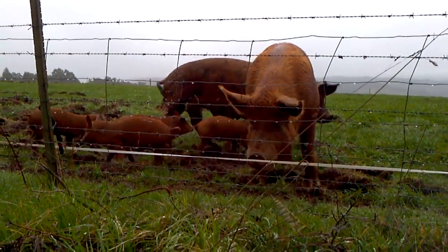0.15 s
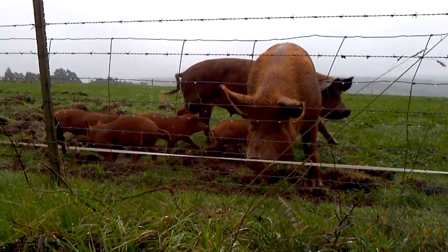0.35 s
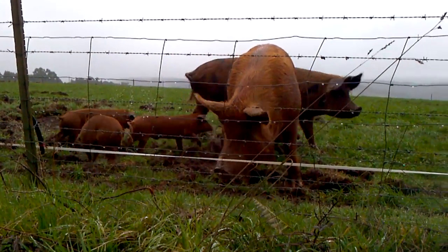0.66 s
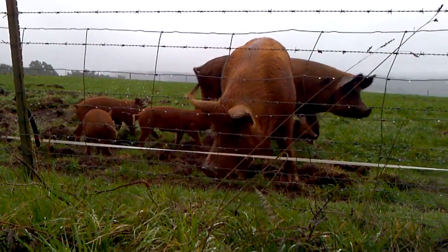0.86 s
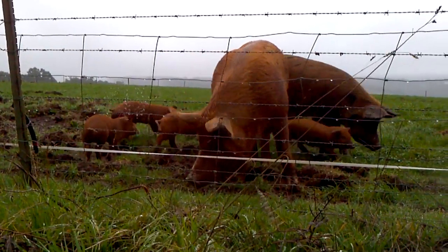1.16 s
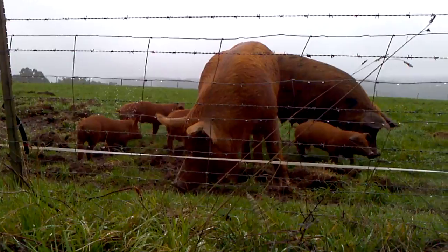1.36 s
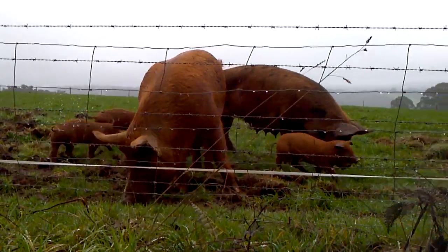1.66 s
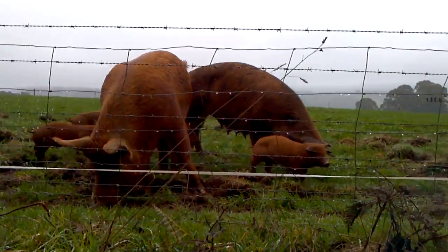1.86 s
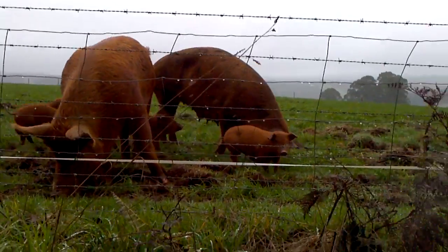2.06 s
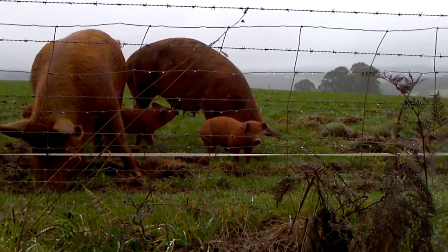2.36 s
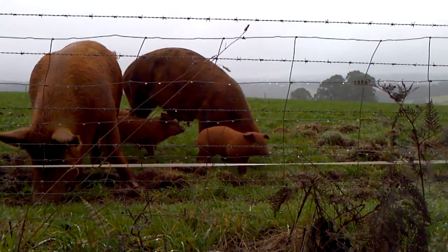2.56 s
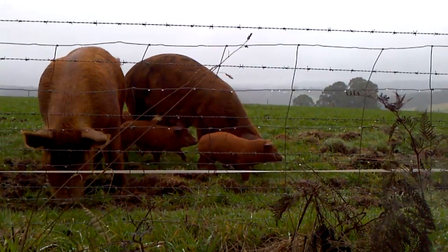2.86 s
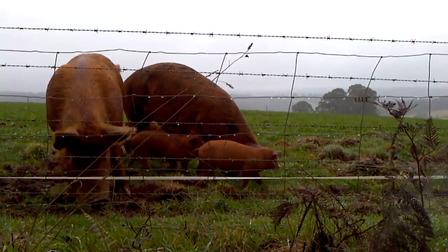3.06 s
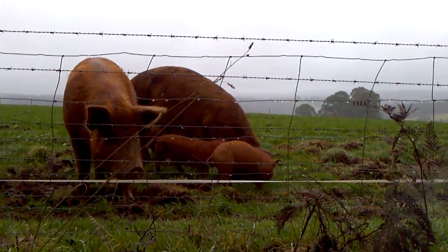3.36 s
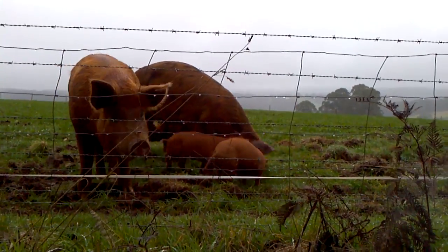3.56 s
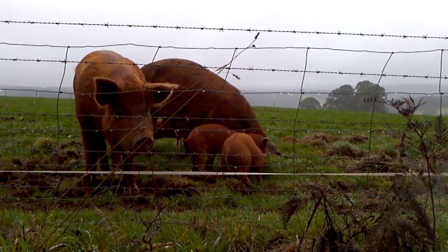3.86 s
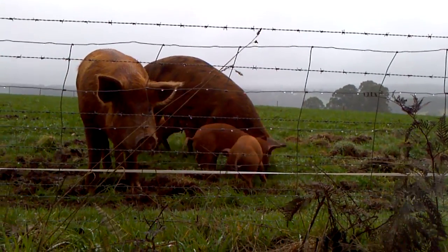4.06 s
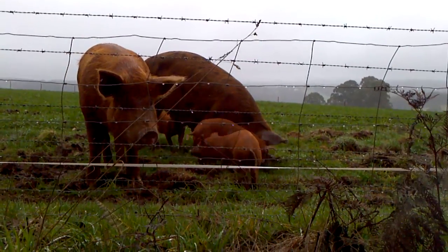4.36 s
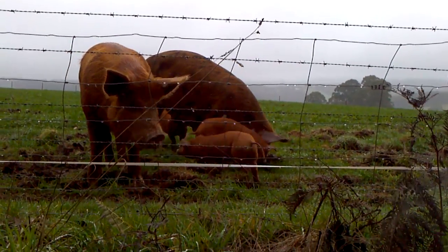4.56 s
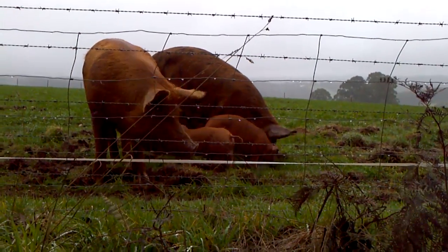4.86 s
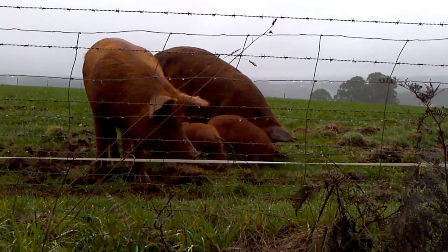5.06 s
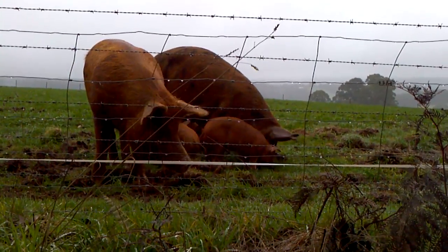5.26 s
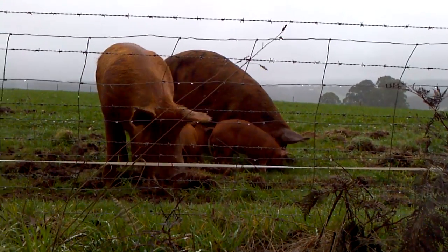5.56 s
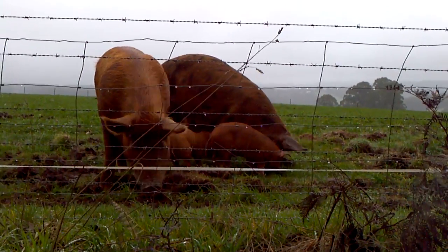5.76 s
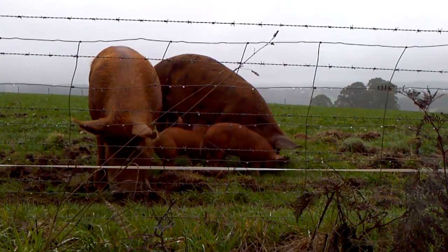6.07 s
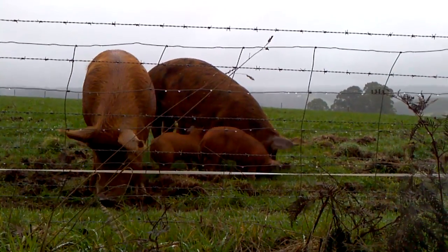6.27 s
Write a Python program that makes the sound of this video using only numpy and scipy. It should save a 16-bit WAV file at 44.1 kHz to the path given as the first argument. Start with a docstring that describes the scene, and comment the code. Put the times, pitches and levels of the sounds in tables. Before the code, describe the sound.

Outdoors in a wet pasture, an engine idles throughout in rapid soft puffs with a faint steady hum. Wind rumbles low, opening with a gust. Piglets start with a weak squeak and dry clicking creaks up to 0.5 s. From 0.7 to 1.5 s hoarse rasps and high squeals overlap, bending downward, then creaks follow. Another raspy squealing run lasts from about 2 to 2.6 s, with a hard wind thump at 2.1. Two quick wet mud smacks come near 2.85 s. At 3.3 s a sow gives one tiny, sagging low grunt amid creaking and rasping. Strong gusts thump around 3.2 and 3.8 s. Harsh cries burst from 3.9 to 4.4 s, one sharply loud near the start. Calls thin to small creaks around 5 s, then squeaks peak piercingly at 5.6. A softer smack at 5.8 s and faint squeals end it. The sound is thin, centred and muffled on top.

```python
"""An engine idles in noise puffs and firing-rate tones while gusts of low noise and thumps buffet the mic.
Piglets in a wet field squeal in three flickering partials, creak in rows of ringing clicks and rasp in
dense partials that break up under sliding resonances. Noise bursts smack in the mud, first near 3 s, and
a sow grunts once, at 3.3 s, in sagging pulses that ring her chest. The single mic has no bass, little top."""
import sys
import numpy as np
from scipy import signal
from scipy.fft import rfft, irfft
from scipy.io import wavfile

SR = 44100
rng = np.random.default_rng(int(sys.argv[2]) if len(sys.argv) > 2 else 0)


def generate_wav(sig):
    """Save sig (samples, or channels by samples) to the path in sys.argv[1] as 16-bit PCM at SR."""
    pcm = np.round(np.clip(np.atleast_2d(sig).T, -1, 1) * 32767).astype(np.int16)
    wavfile.write(sys.argv[1], SR, pcm)


N = 283510


def amp(db):
    """Gain of a level in dB."""
    return 10 ** (np.asarray(db) / 20)


def rms_one(x):
    """Scaled to unit rms."""
    return x / np.sqrt(np.mean(x ** 2) + 1e-20)


def in_time(rows, span=slice(0, N)):
    """Columns of a table, drawn as straight lines between its moments."""
    s, *columns = np.transpose(rows)
    t = np.arange(N)[span] / SR
    return [np.interp(t, s, column) for column in columns]


def call(start_s, end_s, fade_s):
    """Samples that a call covers and its straight fade in and out."""
    span = slice(int(start_s * SR), min(int(end_s * SR), N))
    k = np.arange(span.stop - span.start)
    return span, np.clip(np.minimum(k, k[::-1]) / (fade_s * SR), 0, 1)


def slow(rate_hz, size=N):
    """Wandering curve of spread 1: noise through a double one-pole low-pass, past its run-in."""
    run_in = 3000
    r = np.exp(-2 * np.pi * rate_hz / SR)
    noise = rng.standard_normal(size + run_in)
    return rms_one(signal.lfilter([1], [1, -2 * r, r * r], noise))[run_in:]


def ring(clicks, hz, t60):
    """A resonance: a unit click starts a sine of height 1 that dies by 60 dB in t60 seconds."""
    r, w = amp(-60 / (t60 * SR)), 2 * np.pi * hz / SR
    return signal.lfilter([0, np.sin(w)], [1, -2 * r * np.cos(w), r * r], clicks + 1e-18)


def pulses(rate_hz):
    """One unit sample per cycle."""
    return np.diff(np.floor(np.cumsum(rate_hz) / SR), prepend=0)


def bandpass(x, low_hz, high_hz):
    """Gentle second-order band."""
    return signal.sosfilt(signal.butter(2, [low_hz, high_hz], "band", fs=SR, output="sos"), x)


# Colour of the exhaust noise. Each row: frequency in Hz, relative density in dB per Hz.
ENGINE_COLOUR = [(24, -49), (45, -13.5), (75, -4.5), (100, -10.5), (125, -3.5), (202, -14), (307, -1),
                 (523, -11), (700, -9), (1600, -18.5), (6130, -26), (7000, -32.5), (8000, -82.5),
                 (17600, -120)]
# Orders that stand out as tones. Each row: multiple of the firing rate, mean level in dB.
EXHAUST_ORDERS = [(5, -53), (12, -53), (13, -55), (15, -56.5)]
FIRING_HZ, FIRST_FIRING_S = 24.57, .008
ENGINE_DB = -46   # noise rms


def engine():
    """Exhaust noise puffs once per firing; some orders of the firing rate stand out as tones."""
    t = np.arange(N) / SR
    turns = FIRING_HZ * (t - FIRST_FIRING_S) + .04 * slow(2.05)   # idle wanders a little
    cycle = turns % 1
    puff = 9 * cycle * np.exp(-7 * cycle) * amp(2 * slow(15))
    hz = np.maximum(np.fft.rfftfreq(N, 1 / SR), 1)
    colour_hz, colour_db = np.transpose(ENGINE_COLOUR)
    colour = amp(np.interp(np.log(hz), np.log(colour_hz), colour_db))
    puffing = rng.standard_normal(N) * (0.55 + puff)
    noise = rms_one(irfft(rfft(puffing) * colour, N))
    tones = np.zeros(N)
    for order, db in EXHAUST_ORDERS:
        tones += amp(db + 3.7 * slow(4.9)) * np.sin(2 * np.pi * (order * turns + rng.random()))
    return noise * amp(ENGINE_DB + 1.52 * slow(0.37)) + tones


# Swells of the wind. Each row: peak in seconds, level in dB.
GUSTS = [(.1, -36), (1.25, -44.5), (2.0, -41.5), (2.17, -44), (2.62, -42.5), (3.25, -32.5), (3.46, -40),
         (3.78, -30), (4.0, -33.5), (4.75, -37), (5.82, -42.5), (6.27, -44)]
BREEZE_DB, GUST_RISE_DB_PER_S, GUST_FALL_DB_PER_S = -51, 121.5, 85


def gusts():
    """Strength of the wind: a breeze plus gusts that rise fast and ebb slower."""
    strength = np.full(N, amp(BREEZE_DB))
    for peak_s, db in GUSTS:
        since = np.arange(N) / SR - peak_s
        strength += amp(db + np.minimum(GUST_RISE_DB_PER_S * since, -GUST_FALL_DB_PER_S * since))
    return strength


# Eddies that thump the microphone port. Each row: start in seconds, strength in dB.
BUFFETS = [(1.442, -25), (1.49, -22), (1.691, -24.5), (2.004, -25), (2.12, -12.5), (2.588, -17.5),
           (2.734, -23), (3.147, -16), (3.424, -21), (3.721, -20.5), (3.781, -12), (3.809, -12),
           (3.86, -23.5), (4.004, -24.5), (4.71, -24.5), (5.77, -29), (5.856, -30.5), (6.224, -26.5)]


def wind():
    """Lumpy low turbulence, with the strongest eddies as damped 150 Hz thumps."""
    lumpy = rng.standard_normal(N) * amp(4.34 * slow(20))
    out = rms_one(bandpass(lumpy, 100, 240)) * gusts()
    t = np.arange(2000) / SR
    envelope = (1 - np.exp(-t / 0.0012)) * np.exp(-t / 0.013)
    for s, db in BUFFETS:
        # a hard eddy starts with a quick flick in pitch
        turns = 150 * t + 0.06 * (db + 34.5) * (1 - np.exp(-t / 0.0031))
        out[int(s * SR):][:len(t)] -= amp(db - 3.5) * envelope * np.sin(2 * np.pi * turns)
    return out


# Short squeaks. Each row: start, loudest moment and end in seconds, pitch in Hz at those three moments,
# level in dB, fundamental and third partial in dB against the level, roughness from 0 to 1.
SQUEAKS = [(0, .01, .23, 2000, 2000, 1970, -53, -2, -8, .4),
           (.745, .785, .87, 2355, 2290, 1990, -41, 5.5, -2, .1),
           (.95, 1.01, 1.035, 1723, 1715, 1710, -34, -22, -4, .2),
           (1.04, 1.08, 1.11, 1614, 1830, 1870, -36, -4, 0, .1),
           (1.44, 1.465, 1.485, 1104, 1060, 1037, -58, 18.5, -4, .2),
           (2.53, 2.58, 2.65, 1800, 2100, 1750, -48, -8, -8, .3),
           (2.645, 2.665, 2.705, 1166, 1030, 960, -45, 3, -2, .1),
           (3.455, 3.49, 3.51, 2340, 2250, 1960, -42, -6, -4, .15),
           (3.71, 3.74, 3.795, 1950, 2026, 1860, -48, 2, -4, .3),
           (3.92, 3.955, 3.985, 700, 975, 990, -38, -2, 13, .25),
           (3.985, 4.0, 4.055, 1255, 1240, 1213, -50, 11, -4, .1),
           (4.035, 4.07, 4.12, 1646, 1730, 1670, -36, -33, -4, .4),
           (4.335, 4.39, 4.435, 1154, 1370, 1260, -54, 17.5, -4, .9),
           (5.43, 5.452, 5.475, 1700, 1985, 2060, -35, -4, -4, .25),
           (5.515, 5.54, 5.595, 2000, 2550, 2200, -43, 10, -4, .2),
           (5.605, 5.64, 5.67, 2370, 2600, 2380, -26, -15, -10, .25),
           (6.012, 6.025, 6.045, 1850, 2090, 2350, -38, -14, -10, .25)]
SWELL_DB, DIE_DB = 9.0, 9.0   # gain up to the loudest moment, loss after it


def squeak_curve(start_s, loudest_s, end_s, start_hz, loudest_hz, end_hz, db, first_db, third_db, rough):
    """A squeak swells to its loudest moment and dies away while the pitch bends."""
    start = (start_s, start_hz, db - SWELL_DB)
    loudest = (loudest_s, loudest_hz, db)
    end = (end_s, end_hz, db - DIE_DB)
    return first_db, third_db, rough, [start, loudest, end]


# Long squeals. Each row: fundamental and third partial in dB against the level, roughness from 0 to 1,
# then a curve of moments, each with time in seconds, pitch in Hz, level in dB.
SQUEALS = [ (-9, -6, 0.06, [(1.095, 2230, -27), (1.15, 2183, -39.5), (1.22, 1936, -35.5),
           (1.295, 1855, -41)]), (-3, 1, 0.11, [(2.075, 2200, -43), (2.125, 2000, -40.5),
           (2.165, 2114, -35.5), (2.25, 2060, -47), (2.32, 1927, -36), (2.42, 1830, -48)]),
           (-4, -10, 0.081, [(4.09, 2485, -48), (4.125, 2250, -48), (4.22, 2415, -39.5),
           (4.25, 2245, -27.5), (4.285, 1940, -55)]), (5, 2.5, 0.08, [(6.24, 1815, -55.5),
           (6.3, 1737, -56.5), (6.39, 1847, -52), (6.428, 1800, -56)])]
JITTER = .09   # fast pitch unsteadiness at full roughness, share of the pitch


def squeals():
    """Whistle-like voice: three partials on a slightly unsteady pitch, each flickering on its own."""
    out = np.zeros(N)
    for first_db, third_db, rough, rows in SQUEALS + [squeak_curve(*row) for row in SQUEAKS]:
        span, fade = call(rows[0][0], rows[-1][0], .006)
        hz, db = in_time(rows, span)
        size = len(hz)
        unsteady_hz = hz * (1 + .008 * slow(60, size) + rough * JITTER * slow(300, size))
        phase = 2 * np.pi * np.cumsum(unsteady_hz) / SR
        for partial, partial_db in enumerate([first_db, 0, third_db], start=1):
            flicker = amp(2.5 * slow(30, size)) + .3 * slow(200, size)
            out[span] += fade * amp(db + partial_db) * flicker * np.sin(partial * phase)
    return out


# Rows of single vocal-fold flaps. Each row: first and last flap in seconds, flaps per second,
# level at the middle of the swell in dB, treble in dB against it.
CREAKS = [(.075, .175, 72, -38, -7), (0.382, .52, 60, -42, -7), (1.505, 1.562, 78, -33.5, 0),
          (1.591, 1.659, 73, -36, -9), (1.92, 1.97, 49, -37.5, 8), (3.224, 3.34, 71, -40, -15),
          (4.811, 4.84, 79, -38.5, -1.5), (4.995, 5.015, 62, -44.5, 5), (5.474, 5.486, 81, -36.5, 6),
          (5.896, 5.968, 75, -41.5, 8)]
# Resonances that a flap sets ringing. Each row: frequency in Hz, level in dB, 60 dB decay in seconds.
THROAT = [(2045, -7, 0.02), (3300, -1, 0.011), (4720, -8.5, 0.018)]
# The mouth's resonances. Each row: frequency in Hz, level in dB, 60 dB decay in seconds.
MOUTH = [(5730, -19.5, 0.018), (6230, -1, 0.0087)]


def creaks():
    """Each flap rings throat and mouth; the row swells and fades."""
    low, high = np.zeros((2, N))
    for first_s, last_s, per_s, db, treble_db in CREAKS:
        at = (np.arange(first_s, last_s, 1 / per_s) * SR).astype(int)
        chance = rng.standard_normal((20, 2))[:len(at)]
        swell = np.sin(np.pi * np.arange(1, len(at) + 1) / (len(at) + 1))
        low[at] += swell * amp(db + 2.5 * chance[:, 0])
        high[at] += swell * amp(db + treble_db + 3.5 * chance[:, 1])
    throat = sum(amp(db) * ring(low, hz, t60) for hz, db, t60 in THROAT)
    mouth = sum(amp(db) * ring(high, hz, t60) for hz, db, t60 in MOUTH)
    return throat + mouth


# Hoarse cries. Each row: start and end in seconds, effort in dB,
# upper throat resonance in Hz at the start and at the end.
RASP = [(0.696, 0.939, -32.5, 6350, 4556), (0.922, 1.066, -25.5, 5410, 5105),
        (1.031, 1.196, -28, 5430, 4870), (1.173, 1.342, -34.5, 4910, 5350),
        (1.307, 1.501, -26.5, 4790, 5845), (1.666, 1.697, -47, 4480, 4450),
        (1.957, 2.084, -29.5, 5880, 5610), (2.073, 2.279, -32.5, 6240, 6130),
        (2.219, 2.615, -42, 5740, 5530), (3.339, 3.409, -27.5, 6490, 5620), (3.41, 3.504, -39, 5960, 6200),
        (3.681, 3.738, -42, 4990, 5880), (3.832, 4.049, -39, 5505, 4820), (3.923, 3.975, -19.5, 5285, 6280),
        (4.029, 4.145, -29.5, 5600, 4840), (4.129, 4.329, -33, 4890, 5340), (4.329, 4.419, -27, 4984, 5280),
        (5.424, 5.46, -36, 5400, 6200), (5.482, 5.595, -32, 6030, 5030), (5.588, 5.696, -33.5, 5100, 5620),
        (6.001, 6.204, -41, 5240, 4940), (6.181, 6.42, -47, 6440, 6110)]
# louder cries are brighter: lower resonance (dB) at a usual effort (dB), and its loss per dB of effort
LOWER_DB, USUAL_DB, LOSS_PER_DB = -4.5, -35.5, 0.38


def rasp():
    """Hoarse voice: dense partials break up and return under throat resonances that slide with the mouth."""
    out = np.zeros(N)
    for start_s, end_s, db, from_hz, to_hz in RASP:
        lower_db = LOWER_DB - LOSS_PER_DB * (db - USUAL_DB)
        span, fade = call(start_s, end_s + .012, 0.28 * (end_s - start_s))
        size = len(fade)
        upper_hz = np.linspace(from_hz, to_hz, size)
        pitch_hz = upper_hz / 12 * (1 + .03 * slow(13, size) + .005 * slow(250, size))
        phase = 2 * np.pi * np.cumsum(pitch_hz) / SR
        # each resonance: centre in Hz, half-width in Hz, level in dB
        resonances = [(upper_hz, 500, 0), (upper_hz * 1.168, 500, -6),
                      (3450, 450, lower_db), (1900, 800, lower_db - 10)]
        voice = np.zeros(size)
        for k in range(1, 18):
            throat = sum(amp(level_db) / (1 + ((k * pitch_hz - centre_hz) / width_hz) ** 2)
                         for centre_hz, width_hz, level_db in resonances)
            breakup = amp(5.5 * slow(28, size)) + .6 * slow(260, size)
            voice += throat * breakup * np.sin(k * phase + 2 * np.pi * rng.random())
        out[span] += fade * amp(db - 12 + 0.77 * slow(26, size)) * voice
    return out


# Wet smacks in the mud. Each row: start in seconds, burst level in dB ahead of the band filter.
SMACKS = [(2.835, -22.5), (2.87, -30.5), (5.817, -27)]


def smacks():
    """Bright noise bursts of a few milliseconds."""
    hits = np.zeros(N)
    for s, db in SMACKS:
        hits[int(s * SR)] = amp(db)
    decay = signal.lfilter([1], [1, -np.exp(-1 / (.0025 * SR))], hits)
    return bandpass(decay * rng.standard_normal(N), 3000, 4900)


GRUNT_S, GRUNT_LENGTH_S, GRUNT_ATTACK_S, GRUNT_DB = 3.333, 0.05, 0.0068, -28
GRUNT_HZ, GRUNT_SAG_HZ_PER_S, GRUNT_DECAY_DB_PER_S = 182, 490, 331


def grunt():
    """Regular pulses of the sow's folds ring her chest; pitch and level sag."""
    span, fade = call(GRUNT_S, GRUNT_S + GRUNT_LENGTH_S, GRUNT_ATTACK_S)
    t = np.arange(len(fade)) / SR
    beat = pulses(GRUNT_HZ - GRUNT_SAG_HZ_PER_S * t)
    voice = ring(beat, 337, 0.066) + 8.3 * ring(beat, 540, 0.0042)
    out = np.zeros(N)
    out[span] = fade * amp(GRUNT_DB - GRUNT_DECAY_DB_PER_S * t) * voice
    return out


def scene():
    """All sources reach one microphone, heard alike on both channels."""
    voices = squeals() + rasp() + creaks() + smacks()
    # the microphone loses the top of piglets and smacks above the presence range
    voices = signal.sosfilt(signal.butter(12, 7000, fs=SR, output="sos"), voices)
    return np.tile(voices + grunt() + wind() + engine(), (2, 1))


CUTOFF_HZ = 9090   # edge from which all is at least 70 dB down


def record(dry):
    """Bass is filtered off, the top is cut steeply."""
    lean = signal.sosfilt(signal.butter(3, 70, "high", fs=SR, output="sos"), dry)
    return signal.sosfilt(signal.cheby2(14, 70, CUTOFF_HZ, fs=SR, output="sos"), lean)


dry = scene()
out = record(dry)
generate_wav(out)
```